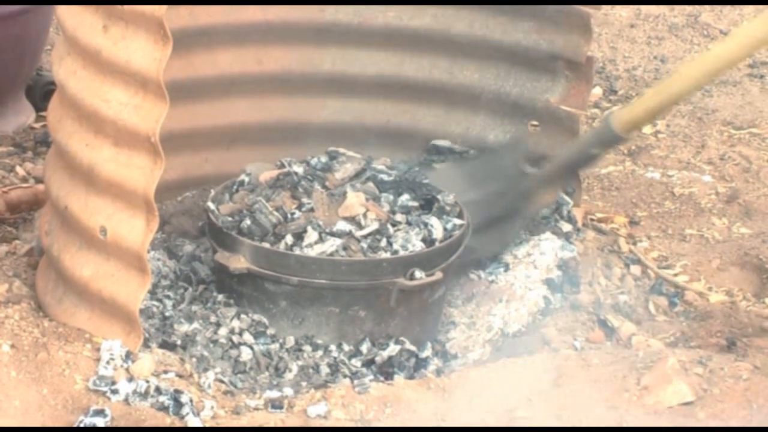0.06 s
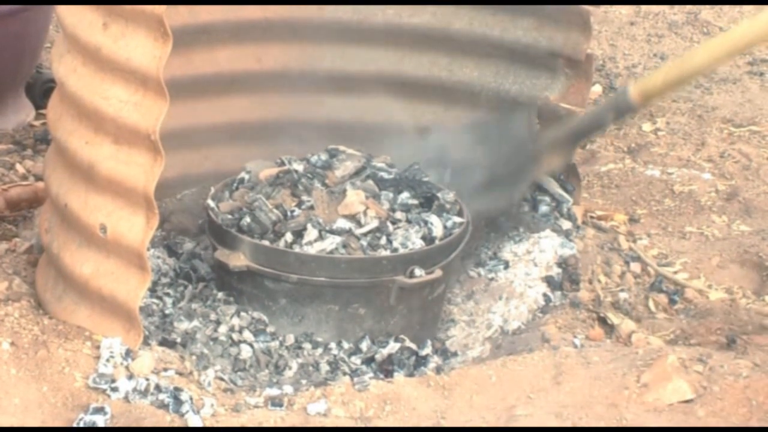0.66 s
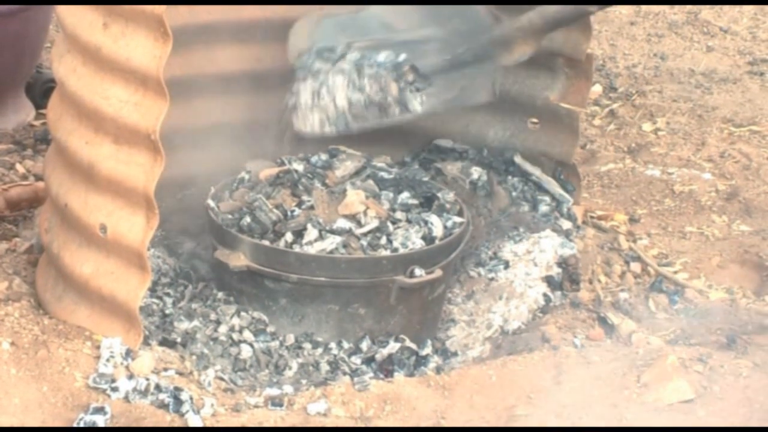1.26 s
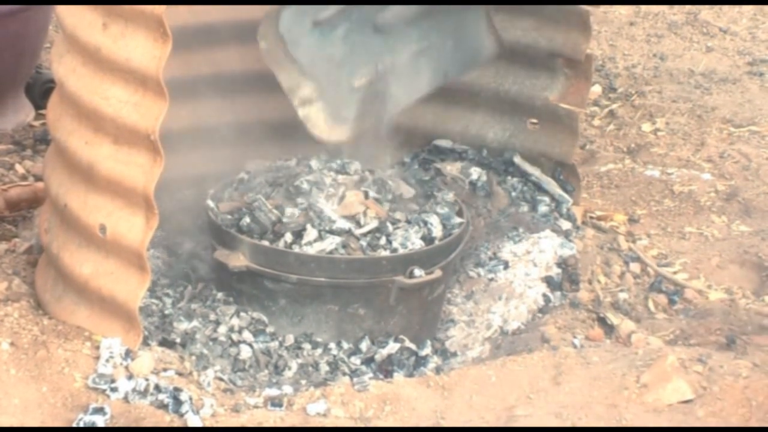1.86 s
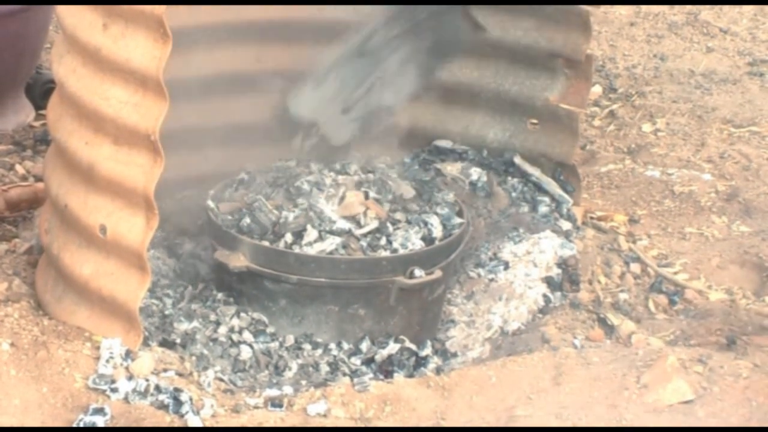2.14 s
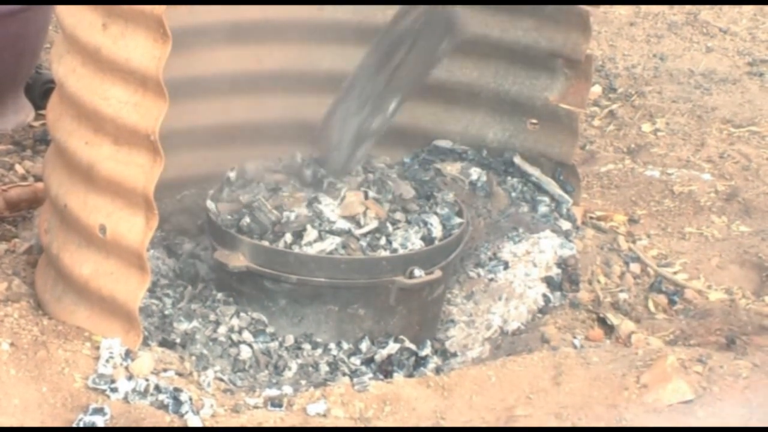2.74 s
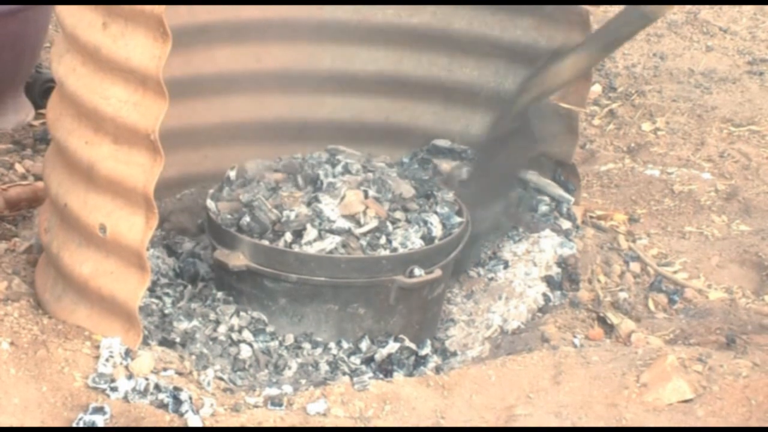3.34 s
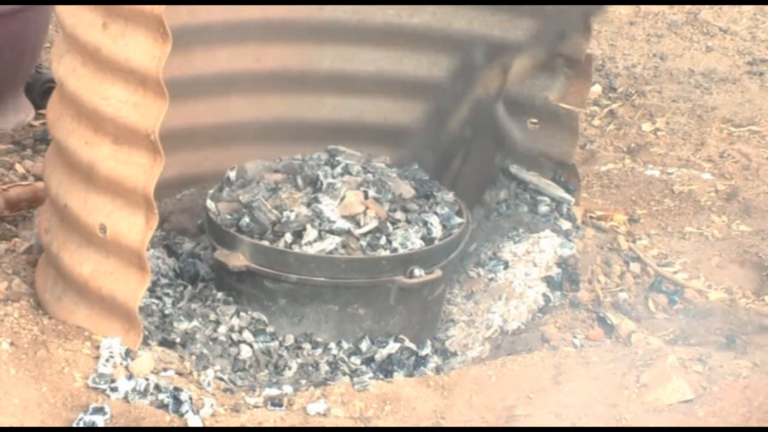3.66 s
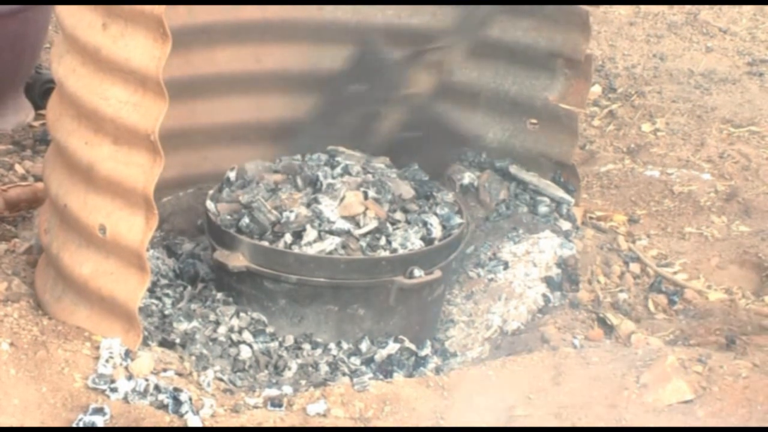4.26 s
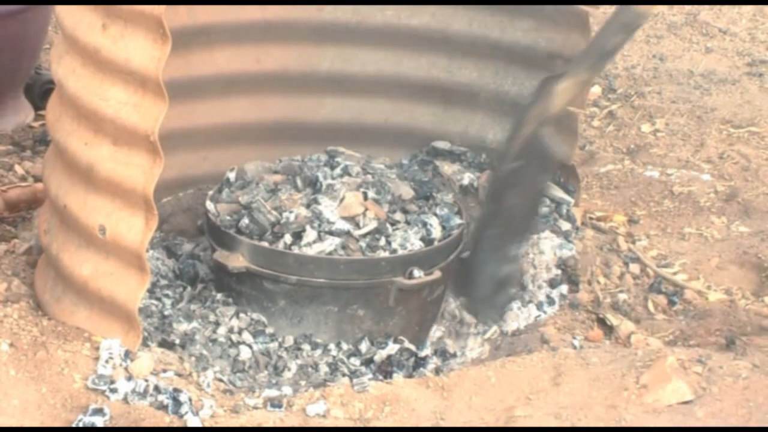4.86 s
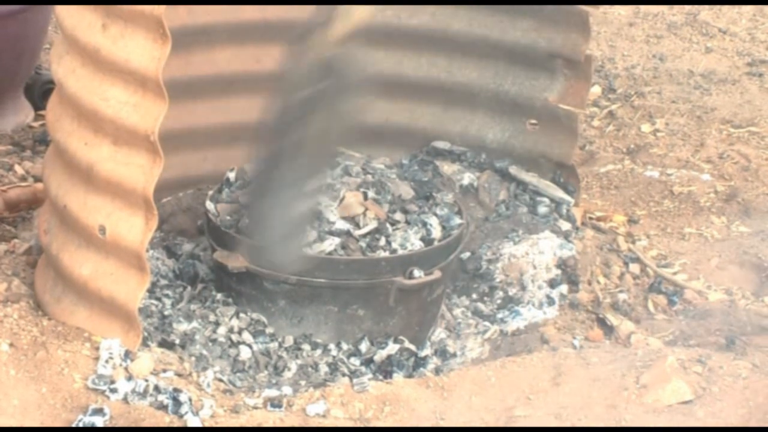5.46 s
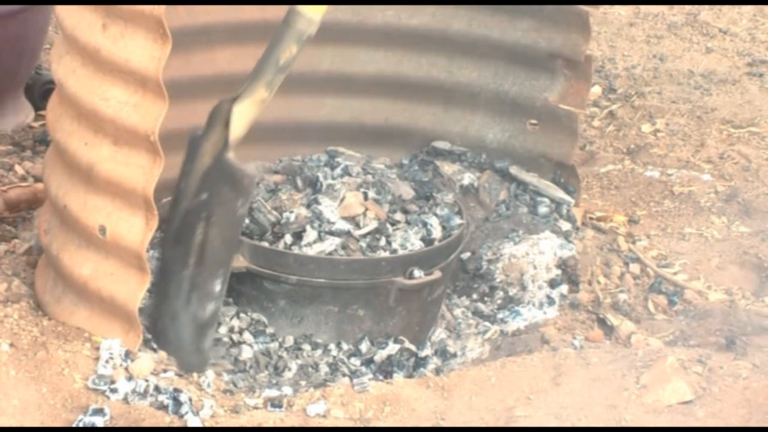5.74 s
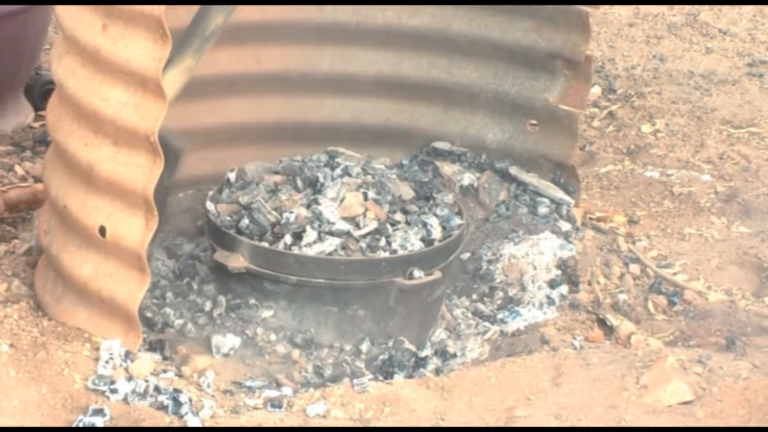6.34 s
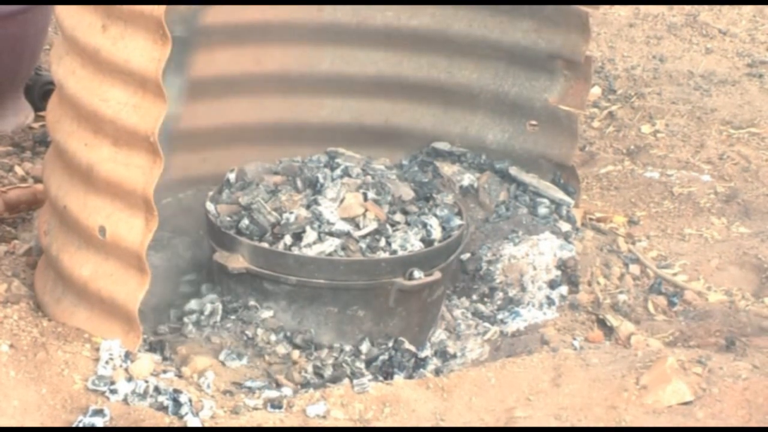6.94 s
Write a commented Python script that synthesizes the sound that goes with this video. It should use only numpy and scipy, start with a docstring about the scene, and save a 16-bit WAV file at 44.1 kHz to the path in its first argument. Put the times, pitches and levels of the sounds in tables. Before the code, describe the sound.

Outdoors, a metal shovel knocks and rings on an iron pot while brittle coals crunch, slide and tick under faint wind.

```python
"""A steel shovel digs charcoal beside a cast-iron pot, tips it on the lid, then rakes coals round the pot.
The blade clanks on the iron, choked while loaded, ringing once empty; brittle coals crunch, slide, tick.
A corrugated windbreak adds short echoes. Light wind flutters on the microphone over quiet outdoor hiss."""
import sys
import numpy as np
from scipy import signal
from scipy.fft import rfft, irfft
from scipy.io import wavfile
from scipy.ndimage import uniform_filter1d

SR = 44100
rng = np.random.default_rng(int(sys.argv[2]) if len(sys.argv) > 2 else 0)


def wav_out(sig):
    """Save sig, one row per channel (or a flat mono array), as 16-bit PCM at SR to the path in sys.argv[1]."""
    wavfile.write(sys.argv[1], SR, np.round(np.clip(np.atleast_2d(sig).T, -1, 1) * 32767).astype(np.int16))


N = 308382
TIME_S = np.arange(N) / SR

# shovel blows: (time [s], level [dB], bass [dB], clatter t60 [s], contact [0 tip in coals, 1 side on pot])
SHOVEL_BLOWS = [(.004, -17.5, -25, 0.089, 0.94), (.03, -12, -2, 0.067, 0.64),
                (0.094, -12, -15, 0.027, 0.46), (.347, -13, -12, 0.051, 0.88),
                (.377, -28.5, -12, 0.092, 0.23), (0.393, -15.5, -2, 0.035, 0.58),
                (.59, -32, 17, 0.029, 0.24), (.662, -16.5, -13, 0.12, 0.73), (.699, -20, -2, .14, 0.63),
                (.933, -33.5, 8, 0.02, 0.65), (1.026, -8.5, -4, 0.16, 0.81), (1.221, -18, 12, 0.19, 0.92),
                (2.038, -67, -17, .09, 0.58), (3.598, -13.5, -5.5, 0.11, .8),
                (3.618, -28.5, 9, 0.073, 0.98), (3.717, -16, 6, 0.14, 0.62), (3.748, -18.5, 13, 0.05, 0.27),
                (4.006, -56, -13, 0.14, 0.3), (4.211, -15.5, -38, 0.095, 0.41),
                (4.254, -17.5, -42.5, 0.17, 0.14), (4.279, -14, 2, 0.038, 0.68),
                (4.319, -12, -0.5, 0.16, 0.83), (4.328, -10, 5.5, 0.12, 0.61), (4.519, -31, -8, 0.1, 0.9),
                (4.747, -50, -25, 0.078, 0), (4.849, -43, -30, 0.074, 0), (4.878, -29.5, -4, 0.034, 0.83),
                (5.186, -33, -14, 0.34, 0.43), (5.216, -35.5, -20, .12, 0.06),
                (6.678, -21.5, -34, 0.047, 0.45), (6.859, -24, 2, 0.013, 0.61),
                (6.89, -19.5, -22, 0.031, 0.43), (6.903, -24.5, 11, 0.033, 0.78)]
# steel-on-iron clatter: (frequency [Hz], level [dB])
CLATTER_SPECTRUM = [(100, -32), (250, -22.5), (400, -8), (700, -8), (1000, -3.5), (2000, -2), (3000, 3.5),
                    (3700, -6), (5500, -5.5), (7200, -16.5), (8500, -17.5), (11000, -24), (16000, -49)]
# blade modes: (frequency [Hz], t60 [s], tip-struck level [dB], side-struck level [dB])
BLADE_MODES = [(1354, .9, -22, -9), (1487, .5, -16, -7), (1690, .55, -28, -16), (1776, .62, -6.5, -19),
               (1954, .62, -10.5, -9), (2659, .56, -10, -20), (2955, .38, -7, -15), (1075, .13, -26, -8),
               (2050, .1, -16, -2), (2153, .18, -16, -1), (2250, .17, -10, -3), (2541, .24, -20, -7),
               (2730, .12, -5, -2), (3187, .17, 2, -10), (3386, .12, -12, -7), (3817, .2, -4, -12),
               (4420, .14, -8, -16), (5276, .15, -5, -18), (5787, .17, -13, -25)]
# pot and lid modes: (frequency [Hz], t60 [s], level [dB])
POT_MODES = [(385, 0.35, -14), (503, 0.22, -7.5), (583, 0.057, 6), (867.7, 0.29, 4.5), (965, 0.084, 9.5),
             (1205, 0.3, -3), (1406, 0.056, 13.5), (1558, .18, 3.5), (1670, 0.059, -31), (1958, 0.27, 8.5),
             (1984, 0.2, 2.5), (2135, 0.25, 2.5), (2357, 0.028, -46), (2850, 0.12, -47), (2869, .16, -32.5),
             (2970, 0.195, -19), (3270, 0.65, -12), (4199, 0.2, -23)]
# coals on or around the blade: (start [s], end [s])
CHOKED_SPANS = [(0, 1.9), (3.705, 3.8), (4.21, 4.41), (4.69, 5.17), (5.94, 7)]
# blade pushes through the coals: (peak time [s], level [dB], rise + fall [s])
PUSHES = [(0.017, -20, 0.061), (0.388, -30, 0.08), (0.54, -43, 0.034), (0.722, -25.5, 0.037),
          (3.746, -25, 0.061), (4.004, -51.5, 0.12), (4.29, -25.5, 0.087), (4.532, -41.5, 0.11),
          (4.703, -42.5, 0.035), (4.88, -30.5, 0.046), (5.06, -43.5, 0.16), (5.215, -33.5, 0.042),
          (5.975, -25, 0.038), (6.088, -44, 0.23), (6.212, -38, 0.071), (6.266, -37, 0.05),
          (6.662, -36, 0.033), (6.689, -31.5, 0.035), (6.844, -39, 0.098), (6.891, -28, 0.036),
          (6.964, -32, 0.088)]
# coals sliding off or settling: (peak time [s], level [dB], rise [s], fall [s])
COAL_SPILLS = [(.2, -48, 0.16, 0.39), (.87, -53.5, 0.036, 0.08), (1.8, -50.5, 0.096, 0.28),
               (2.769, -39.5, 0.029, 0.058), (2.87, -50, 0.013, 0.23), (3.85, -48, 0.0066, 0.064),
               (4.776, -39.5, 0.044, 0.12), (6.388, -53, 0.027, .045)]
# charcoal fracture: (frequency [Hz], level [dB])
COAL_SPECTRUM = [(100, -48), (300, -21), (500, -31.5), (800, -10), (1600, -4), (2200, -1), (2900, 5.5),
                 (4600, -3), (5900, 0.5), (7200, -12), (8400, -5), (9500, -13), (13000, -14.5),
                 (16000, -66)]
# outdoor hiss: (frequency [Hz], level [dB])
HISS_SPECTRUM = [(30, -39), (100, -1), (400, 0), (1300, 1.5), (2500, -3), (5000, -6.5), (10000, -6.5),
                 (16000, -9.5)]
# gusts: (start [s], end [s], level [dB])
WIND_GUSTS = [(0.413, 0.782, -46.5), (1.11, 2.14, -54), (2.555, 2.708, -61.5), (2.94, 3.34, -59),
              (3.53, 4.65, -55.5), (4.82, 5.407, -57.5), (5.868, 7.003, -59.5)]
# strongest buffets: (time [s], level [dB], half width [s])
WIND_BUFFETS = [(2.293, -40, 0.011), (3.309, -66, 0.021), (4.672, -49, 0.03), (5.874, -53.5, 0.01),
                (6.481, -42, 0.025), (6.578, -46.5, 0.033)]
# wind on the microphone: (frequency [Hz], level [dB])
WIND_SPECTRUM = [(25, -36), (45, -21), (70, -6), (110, 1), (220, 1), (320, -3.5), (450, -16), (800, -29),
                 (2000, -64.5)]
# single coals cracking or dropping: (time [s], level [dB])
COAL_TICKS = [(0.5593, -48), (0.999, -51), (1.368, -46), (1.945, -44.5), (2.036, -46.5), (2.7273, -39.5),
              (3.8499, -40.5), (5.9454, -26), (6.049, -40.5), (6.435, -47), (6.9323, -31)]


def undb(db):
    """Decibels to gain."""
    return 10 ** (np.asarray(db) / 20)


def unit(x):
    """Scale to rms 1."""
    return x / np.sqrt(np.mean(x ** 2))


def decay(time_s, t60_s):
    """Gain falling 60 dB per t60_s."""
    return np.exp(-np.log(1000) * time_s / t60_s)


def add(out, start_s, x):
    """Mix x into out from start_s."""
    i = max(int(start_s * SR), 0)
    out[i:i + len(x)] += x[:N - i]


def colour(x, spectrum, taps=2048):
    """Minimum-phase filter through (Hz, dB) points; white noise keeps its power."""
    hz, db = np.transpose(spectrum)
    bin_hz = np.arange(taps // 2 + 1) * SR / taps
    gain_db = np.interp(np.log(bin_hz + 1), np.log(hz), db)
    cepstrum = irfft(np.log(undb(gain_db)))
    cepstrum[1:taps // 2] *= 2
    cepstrum[taps // 2 + 1:] = 0
    response = irfft(np.exp(rfft(cepstrum)))
    return signal.fftconvolve(x, response / np.linalg.norm(response))[:len(x)]


def shelves(spectrum, bass_db, treble_db, bass_hz=800, treble_hz=3800):
    """Shelve both ends of a (Hz, dB) spectrum."""
    hz, db = np.transpose(spectrum)
    return np.c_[hz, db + bass_db / (1 + (hz / bass_hz) ** 3) + treble_db / (1 + (treble_hz / hz) ** 4)]


def wander(rate_hz):
    """Random steps, smoothed twice; rms 1."""
    hold = int(SR / rate_hz)
    steps = np.repeat(rng.standard_normal(N // hold + 1), hold)
    return unit(uniform_filter1d(uniform_filter1d(steps, hold), hold)[:N])


def burst(t60_s, spectrum, rise_s=0.00093):
    """Decaying noise: dense modes dying together."""
    t = TIME_S[:SR // 3]
    envelope = decay(t, t60_s) * (1 - np.exp(-t / rise_s))
    return colour(envelope * rng.standard_normal(len(t)), spectrum)


def ring(hz, t60_s, db, scatter_db=4, rise_s=0.00085):
    """Decaying modes, gains scattered per strike; starts near rms 1."""
    t = TIME_S[:int(np.max(t60_s) * SR)]
    gains = undb(db + scatter_db * rng.standard_normal(len(hz)))
    phases = rng.uniform(0, 2 * np.pi, len(hz))
    waves = np.zeros(len(t))
    for mode_hz, life_s, gain, phase in np.broadcast(hz, t60_s, gains, phases):
        age_s = t[:int(life_s * SR)]
        add(waves, 0, gain * np.sin(2 * np.pi * mode_hz * age_s + phase) * decay(age_s, life_s))
    return waves * np.sqrt(2) / np.linalg.norm(gains) * (1 - np.exp(-t / rise_s))


def shovel_blows(crack_db=-5.5, crack_t60_s=0.021, clatter_db=-2, firm_db=-20, empty_db=4.5):
    """Each blow cracks, clatters and rings blade and pot; coals on the blade choke its ring."""
    out = np.zeros(N)
    blade_hz, blade_t60_s, tip_db, side_db = np.transpose(BLADE_MODES)
    pot_hz, pot_t60_s, pot_mode_db = np.transpose(POT_MODES)
    for start_s, db, bass_db, t60_s, contact in SHOVEL_BLOWS:
        treble_db = np.interp(contact, [0, 1], [4, -8.5])
        clatter_spectrum = shelves(CLATTER_SPECTRUM, bass_db, treble_db)
        add(out, start_s, undb(db + crack_db) * burst(crack_t60_s, clatter_spectrum))
        add(out, start_s, undb(db + clatter_db) * burst(t60_s, clatter_spectrum))

        struck_db = tip_db + contact * (side_db - tip_db)
        blade = ring(blade_hz, blade_t60_s, shelves(np.c_[blade_hz, struck_db], bass_db, 0)[:, 1])
        when_s = start_s + TIME_S[:len(blade)]
        choked = sum((from_s <= when_s) & (when_s < to_s) for from_s, to_s in CHOKED_SPANS)
        damping = decay(np.cumsum(choked) / SR, 2 * t60_s)
        blade_db = np.interp(contact, [0, 1], [1.5, -9.5]) + empty_db * (1 - choked[0])
        blade_db += 0.42 * (firm_db - db)  # taps mostly ring, hard blows mostly clatter
        add(out, start_s, undb(db + blade_db) * blade * damping)

        pot = ring(pot_hz, pot_t60_s, shelves(np.c_[pot_hz, pot_mode_db], bass_db, treble_db)[:, 1])
        pot_db = np.interp(contact, [0, 1], [-49.5, 1.5])
        add(out, start_s, undb(db + pot_db) * pot)
    return out


def fractures(rate_hz, spread_db):
    """Random brittle impulses: many small, few large."""
    sizes = undb(spread_db * np.minimum(rng.exponential(size=N), 4))
    breaks = rng.random(N) < rate_hz / SR
    return unit(breaks * sizes * rng.choice([-1, 1], N))


def lump_pitches_hz(count, low_hz, high_hz):
    """Log-uniform pitches of assorted charcoal lumps."""
    return np.exp(rng.uniform(np.log(low_hz), np.log(high_hz), count))


def lump_clinks(force, count=30, t60_s=0.22):
    """Each fracture rings one lump, a two-pole resonator."""
    angles_rad = 2 * np.pi * lump_pitches_hz(count, 2000, 9000) / SR
    struck = rng.integers(count, size=N)
    radius = decay(1 / SR, t60_s)
    out = np.zeros(N)
    for lump, angle in enumerate(angles_rad):
        feedback = [1, -2 * radius * np.cos(angle), radius ** 2]
        out += signal.lfilter([np.sin(angle)], feedback, force * (struck == lump) + 1e-12)
    return unit(colour(out, COAL_SPECTRUM))


def coal_crunch(rate_hz, buried_t60_s=0.294, crumb_t60_s=0.036, steel_db=-6, clink_db=-3):
    """Fractures rattle the half-buried blade, shed crumbs and clink lumps."""
    force = fractures(rate_hz, spread_db=4)
    hz, free_t60_s, tip_db, side_db = np.transpose(BLADE_MODES)
    damped_t60_s = 1 / (1 / free_t60_s + 1 / buried_t60_s)
    blade = ring(hz, damped_t60_s, np.maximum(tip_db, side_db))
    steel = unit(signal.fftconvolve(force, blade)[:N])
    power_pole = decay(1 / SR, crumb_t60_s) ** 2
    crumb_power = signal.lfilter([1], [1, -power_pole], force ** 2 + 1e-12)
    crumbs = unit(colour(np.sqrt(crumb_power) * rng.standard_normal(N), COAL_SPECTRUM))
    return unit(crumbs + undb(clink_db) * lump_clinks(force) + undb(steel_db) * steel)


def pushes_and_spills(loose_db=-47, packed_db=-28, rise_share=0.46, screened_until_s=5.5):
    """Gentle moves roll single lumps, hard ones crush many; pushes carry more low grind than spills."""
    out = np.zeros(N)
    loose, packed = coal_crunch(rate_hz=240), coal_crunch(rate_hz=750)
    grind_spectrum = [(100, -26.5), (300, -12), (480, -5.5), (700, 2), (1100, -1), (1800, -27.5),
                      (4000, -13)]
    grind = 0.19 * colour(fractures(rate_hz=810, spread_db=3.5), grind_spectrum)
    highpass = signal.butter(1, 5000, "high", fs=SR, output="sos")

    def swell(peak_s, db, rise_s, fall_s, grind_db, treble_db):
        span = slice(max(int((peak_s - 3 * rise_s) * SR), 0), int((peak_s + 7 * fall_s) * SR))
        t = TIME_S[span] - peak_s
        envelope = undb(db) * np.exp(-np.maximum(t / fall_s, 0) - np.minimum(t / rise_s, 0) ** 2)
        pressure = np.interp(db, [loose_db, packed_db], [0, 1])
        coals = np.sqrt(pressure) * packed[span] + np.sqrt(1 - pressure) * loose[span]
        coals += (undb(treble_db) - 1) * signal.sosfilt(highpass, coals)
        out[span] += envelope * (coals + undb(grind_db) * grind[span])

    for peak_s, db, length_s in PUSHES:
        rise_s = rise_share * length_s
        screen_db = -5 if peak_s < screened_until_s else 0  # shovel behind the pot
        swell(peak_s, db, rise_s, length_s - rise_s, grind_db=3.5, treble_db=screen_db)
    for spill in COAL_SPILLS:
        swell(*spill, grind_db=-7.5, treble_db=-5)
    return out


def outdoor_hiss(level_db=-58.5, drift_db=0.5):
    """Smooth noise, level drifting slightly."""
    return undb(level_db + drift_db * wander(3)) * colour(rng.standard_normal(N), HISS_SPECTRUM)


def wind(lull_db=-71.5, rise_s=0.027, fall_s=0.021, sag_db_per_s=0.5, trim_db=-1, swell_db=2, eddy_db=3):
    """Gusts arrive, sag and drop; eddies flutter on the microphone, with a few stronger buffets."""
    level = undb(lull_db)
    for start_s, end_s, db in WIND_GUSTS:
        age_s = TIME_S - start_s
        edges = np.exp(np.minimum(age_s / rise_s, 0) - np.maximum((TIME_S - end_s) / fall_s, 0))
        level = level + edges * undb(db - sag_db_per_s * np.maximum(age_s, 0))
    level *= undb(trim_db + swell_db * wander(13) + eddy_db * wander(45))
    for peak_s, db, half_width_s in WIND_BUFFETS:
        level += undb(db) * np.exp(-((TIME_S - peak_s) / half_width_s) ** 2)
    return level * colour(rng.standard_normal(N), WIND_SPECTRUM)


def coal_ticks(crack_t60_s=0.075, clink_t60_s=0.061, clink_db=-3):
    """Single lumps crack or land with a dry clink."""
    out = np.zeros(N)
    crack_spectrum = shelves(COAL_SPECTRUM, bass_db=14, treble_db=-1)
    for start_s, db in COAL_TICKS:
        crack = burst(crack_t60_s, crack_spectrum, rise_s=0.00016)
        clink = ring(lump_pitches_hz(4, 2245, 6290), clink_t60_s, db=0)
        add(out, start_s, undb(db) * crack)
        add(out, start_s, undb(db + clink_db) * clink)
    return out


def windbreak(direct, echo_db=-13, t60_s=0.15, delay_s=0.005):
    """Curved sheet iron adds a quick scatter of echoes."""
    response = burst(t60_s, [(100, -11.5), (500, 6.5), (3000, 1.5), (7000, -1), (16000, 0)])
    echoes = signal.fftconvolve(direct, response / np.linalg.norm(response))[:N]
    out = direct.copy()
    add(out, delay_s, undb(echo_db) * echoes)
    return out


def scene():
    """Shovel and coals inside the windbreak, wind and hiss around it; mono."""
    shovelling = shovel_blows() + pushes_and_spills() + coal_ticks()
    return (windbreak(shovelling) + wind() + outdoor_hiss())[None]


def record(dry):
    """48 Hz high-pass, clip at full scale, 16 kHz low-pass."""
    highpass = signal.butter(3, 48, "high", fs=SR, output="sos")
    lowpass = signal.ellip(10, 0.2, 70, 16000, fs=SR, output="sos")
    clipped = np.clip(signal.sosfilt(highpass, dry), -1, 1)
    return signal.sosfilt(lowpass, clipped)


dry = scene()
out = record(dry)
wav_out(out)
```